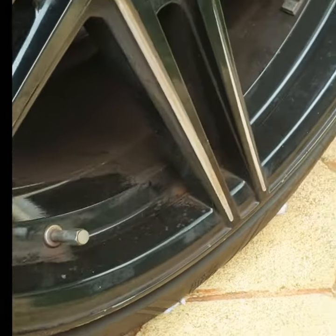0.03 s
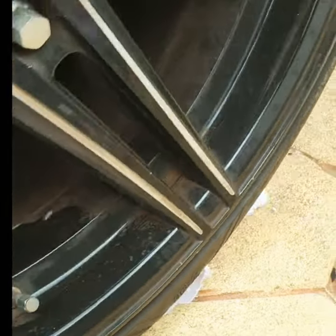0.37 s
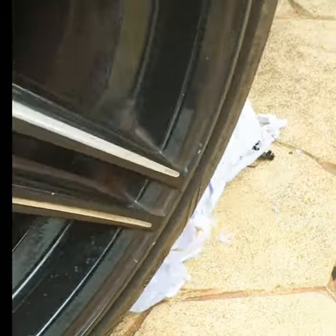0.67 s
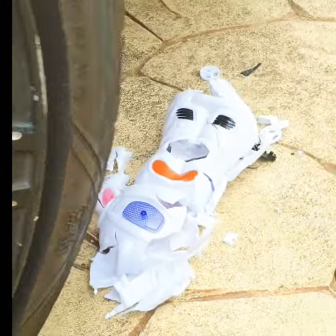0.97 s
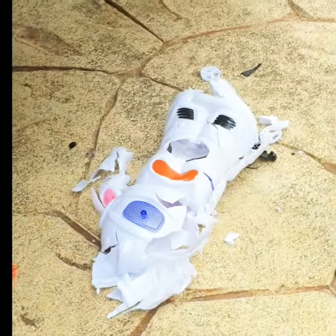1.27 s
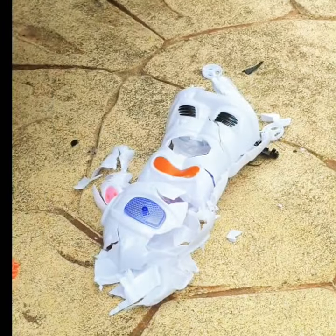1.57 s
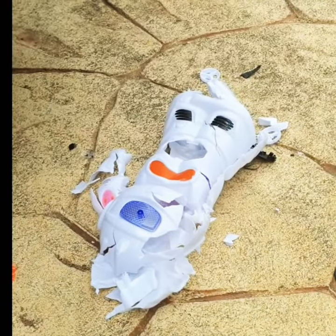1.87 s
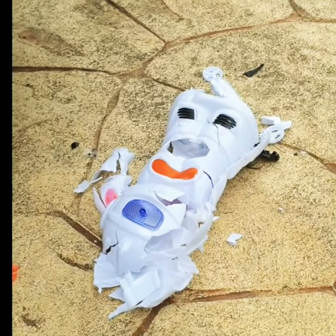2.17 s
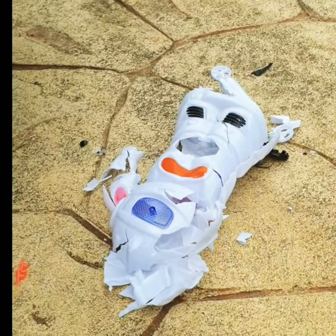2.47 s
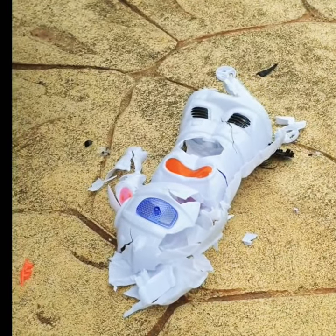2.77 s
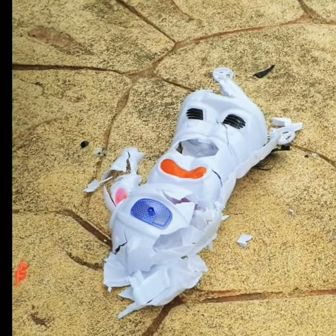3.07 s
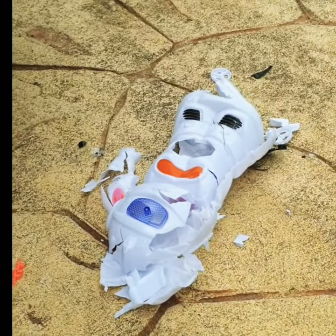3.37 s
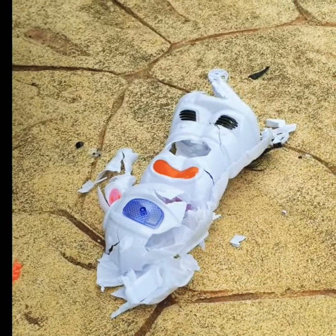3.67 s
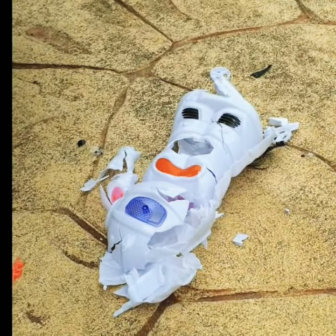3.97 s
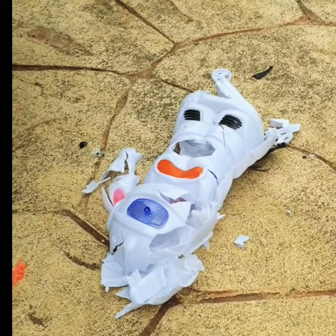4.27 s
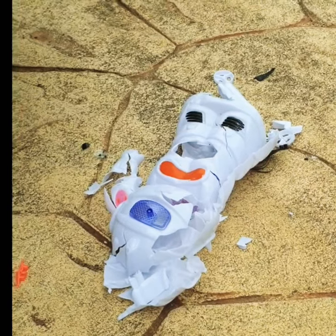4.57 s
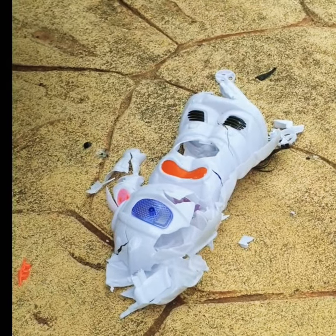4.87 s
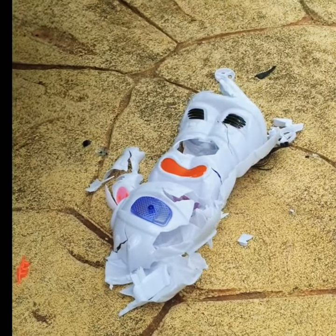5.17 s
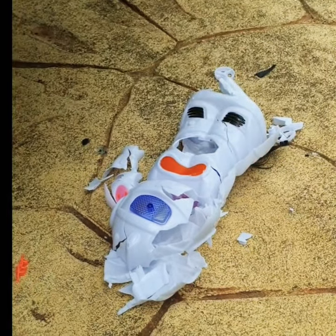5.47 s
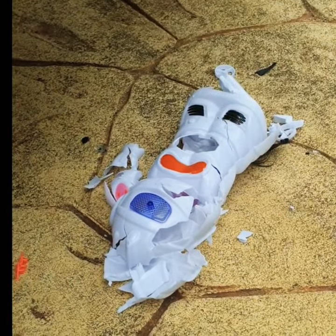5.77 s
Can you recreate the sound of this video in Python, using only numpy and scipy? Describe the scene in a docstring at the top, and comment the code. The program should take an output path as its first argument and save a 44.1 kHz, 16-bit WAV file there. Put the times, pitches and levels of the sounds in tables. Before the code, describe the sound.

A hollow plastic toy cracks sharply and crackles under a car tyre, then the idling engine's low rumble grows louder and revs lightly twice.

```python
"""Sharp cracks, close up: a hollow plastic toy bursts under a creeping car, then crackles as the tyre
rolls off. Stone paving in a yard, a phone's two microphones held just above the toy.
The idling four-cylinder engine booms and knocks, louder as the tailpipe nears, and lifts twice.
Hot metal pings under the car, the tyres crush grit, and the walls return a faint tail."""
import sys
import numpy as np
from scipy import signal
from scipy.fft import rfft, irfft
from scipy.io import wavfile
from scipy.ndimage import uniform_filter1d

SR = 44100
rng = np.random.default_rng(int(sys.argv[2]) if len(sys.argv) > 2 else 0)


def wrap_up_sound(samples):
    """Save the sound to the file named by the first command line argument, as 16-bit audio."""
    columns = np.atleast_2d(samples).T
    # keep every value between -1 and 1, then stretch to whole-number steps
    tamed = np.clip(columns, -1, 1)
    steps = np.round(tamed * 32767).astype(np.int16)
    wavfile.write(sys.argv[1], SR, steps)


N = 265041
T = np.arange(N) / SR

# Table levels are relative: each source adds its own gain.
# fractures of the shell, right under the phone: (time [s], level [dB], hollow thump [dB],
# ringing [dB], bite near 3 kHz [dB], treble [dB], splintering t60 [s], left minus right [dB])
CRACKS = [(.0038, -20, -11, 1, 2, 2, 0.0083, -22), (.0062, -10.5, 5.5, -3.5, -5.5, 3.5, 0.033, 2.5),
          (0.014, -22.5, 7, -2, -3.5, 5, 0.1, 3), (.0635, -35, -17, -20, -3, 1, 0.013, 7),
          (0.1359, -19, -20, -25, -1, -11.5, 0.028, 0), (.174, -40, -26, -22, 13, -7.5, 0.017, 1),
          (0.1913, -10, -14, -21, 1, 4, 0.006, 1), (0.1942, -26.5, -1.5, -9, -2, 4.5, 0.049, -8),
          (0.198, -30, -20, -20, -4, 7, 0.019, 6), (0.3022, -26, -28, -29, 4.5, -11.5, 0.045, 4),
          (0.3626, -12.5, -5, -16, 0.5, 4.5, 0.009, 0), (0.3651, -20.5, 5, -5, -3.5, 6.5, 0.073, 2.5),
          (0.467, -43, -19, -17, -2, -4, 0.063, 6), (0.5052, -26, -12, -28, -4, -5, 0.03, 4),
          (0.514, -42, -22, -20, 4, 7, 0.028, -2), (0.5342, -43, -28, -6, 0, 3, 0.032, 1),
          (.5411, -42, -25, -14, 1, -1, 0.051, 7), (0.5603, -34.5, -25, -26, 4, -4, 0.017, -1),
          (0.6095, -49.5, -19, -22, 3, 8, 0.052, 5), (.6295, -52, -24, -12, 5, 2, 0.023, 1),
          (0.661, -39, -16, -23, 2.5, -1, 0.02, 3), (0.692, -38, -22, -19, 0, -3, 0.11, 2),
          (0.743, -49, -22, -20, -2, 3, .025, 4), (.7522, -47, -19, -20, -5, 7, .02, 2),
          (.7668, -50, -20, -20, -6, 11, .027, 2), (0.787, -36, -24, -26, 4.5, -1, 0.032, 1.5),
          (0.795, -49, -22, -20, 0, 6, .04, 2), (.8185, -54, -18, -20, 0, 3, .02, 2),
          (0.844, -35.5, -23, -27, 1, -4.5, 0.013, 5), (0.916, -42.5, -22, -15, 0, -4, 0.025, 5),
          (0.9962, -49, -22, -22, -6, 7, .031, 1)]
# spectrum of a snapping edge: (frequency [Hz], level [dB])
SNAP_SPECTRUM = [(150, -38), (500, -1), (1100, 4), (1900, 0), (2800, 4.5), (4000, 5), (5200, -0.5),
                 (7000, 1.5), (9000, -5), (11000, -7.5), (15000, -6)]
# ringing of each crack: the shell's modes, with faint thin high tones above them:
# (frequency [Hz], level [dB], t60 [s])
CRACK_RING = [(473, -16, 0.059), (718, 0.5, 0.035), (772, 2, 0.032), (1230, -19, .03), (1410, 6, 0.025),
              (1655, -7, 0.027), (2490, -17, 0.02), (2750, -5, 0.036), (3707, -4, 0.051),
              (4340, -23, 0.043), (5000, -9, 0.059), (6740, -27, .06), (6970, -25, .06),
              (10600, -13, 0.065)]
# modes of the hollow body under the tyre: (frequency [Hz], level [dB], t60 [s])
HOLLOW_MODES = [(141, -13, 0.15), (185, -1, 0.063), (223.3, -21, 0.3), (249, -7.5, 0.063)]
# large pieces springing loose: (time [s], frequency [Hz], level [dB], t60 [s])
PIECES = [(.004, 597, -15, 0.071), (.006, 259, -25, 0.052), (.006, 2875, -26, 0.062),
          (.006, 3880, -29, 0.055), (0.1917, 2650, -16, 0.007), (0.1917, 3750, -17, 0.018),
          (0.1917, 4500, -19, 0.014), (0.193, 660, -20, .022), (.1935, 780, -19.5, 0.034),
          (0.3032, 1040, -38, 0.048), (0.363, 1540, -26, 0.03), (0.3648, 363, -21.5, 0.063),
          (.365, 465, -26, 0.032), (.3655, 720, -28, .025), (.3655, 822, -19.5, 0.054),
          (.366, 990, -30, 0.04), (.7876, 3840, -40, .018)]
CRUMBLE_FROM_S, TYRE_OFF_S, CRUMB_FADE_DB_PER_S = 0.32, 0.95, 2.5

# the engine's pace and exhaust note: (time [s], firing rate [Hz], level [dB])
FIRING = [(0.12, 24.65, -45), (0.9, 24.66, -44.5), (1.39, 23.3, -42.5), (1.89, 23.4, -39),
          (2.05, 23.66, -38), (2.46, 23.77, -34), (3.01, 23, -29.5), (3.45, 28.04, -23.5),
          (3.69, 27.94, -24.5), (4.16, 26.4, -29), (4.31, 24.75, -27.5), (4.46, 23.03, -25),
          (4.49, 23.16, -28), (4.68, 25.01, -21.5), (4.71, 25.06, -22.5), (5.07, 23.52, -27),
          (5.46, 22.44, -27), (5.95, 22.2, -27.5)]
# response of the exhaust pipe: (frequency [Hz], level [dB])
PIPE_SPECTRUM = [(22, -8), (25, 0), (28, 4), (90, 4.5), (112, 1), (140, 0.5), (168, -3.5), (178, -3),
                 (193, 3.5), (208, -12), (270, -6), (400, -15), (560, -22)]
# the tailpipe nears the microphones, then stays: (time [s], level [dB])
NEARNESS = [(0, -45.5), (1.55, -49.5), (2.0, -43.5), (2.6, -39), (3.15, -33.5), (6, -33.5)]
# dabs on the throttle: (start [s], hold [s], load [0-1])
THROTTLE = [(3.22, 0.39, 0.75), (4.537, 0.1, 1)]
# rumble of the exhaust gas: (frequency [Hz], level [dB])
RUMBLE_SPECTRUM = [(25, -30), (53, -4.5), (90, -6.5), (130, -12.5), (193, -5.5), (223, -13.5), (299, -15.5),
                   (374, -10.5), (426, -19), (485, -12.5), (565, -19), (682, -16.5), (904, -22.5),
                   (1500, -28), (1950, -34.5), (3300, -120)]
# hiss of gas and of tread: (frequency [Hz], level [dB])
HISS_SPECTRUM = [(710, -33), (1200, -4), (1570, -7.5), (1690, -9.5), (2020, -7.5), (2440, -9.5),
                 (3860, -13), (4150, -13.5), (4610, -19), (6430, -18), (8980, -24), (11200, -22),
                 (14500, -28.5)]
# ringing body panels: (frequency [Hz], width [Hz], level [dB])
PANEL_BANDS = [(191.5, 5.4, -9), (292.7, 5.1, -12.5), (479.5, 7.1, -16), (691, 10, -23.5)]
# resonances of the engine's knock: (frequency [Hz], width [Hz], level [dB])
KNOCK_BANDS = [(1150, 500, -6), (1560, 330, -6), (2000, 450, -6.5), (3020, 1800, -13)]

# pings from under the car: (time [s], level [dB], second mode [dB], third mode [dB])
PINGS = [(.7012, -31.5, -25, -27), (0.882, -43.5, -18, -21), (0.953, -54, -21, -18), (1.008, -63, -22, -22),
         (1.1152, -56, -18, -18), (1.302, -62, -20, -22), (1.3613, -53.5, -22, -24),
         (1.4121, -55, -11, -22), (1.4896, -46.5, -19, -28), (1.5462, -40.5, -19, -34),
         (1.617, -50.5, -22, -10), (1.652, -59, -20, -20), (1.7589, -49, -26, -26), (1.803, -55, -20, -20),
         (1.865, -55, -18, -18), (1.9032, -44, -27, -30), (1.935, -60, -20, -20), (2.05, -59, -18, -18),
         (2.1284, -55, -7, -15), (2.1974, -50.5, -24, -26), (2.2633, -51, -14, -26),
         (2.3214, -48.5, -24, -26), (2.362, -53, -20, -20), (2.402, -54, -20, -22), (2.6673, -50, -22, -22),
         (2.7064, -53, -14, -8), (2.724, -57, -20, -18), (2.802, -56, -21, -20), (2.885, -56, -20, -20),
         (3.035, -54, -20, -20), (3.0937, -52, -20, -20), (3.1288, -47, -18, -20),
         (3.1609, -47.5, -20, -18), (3.208, -52, -20, -20), (3.4488, -44.5, -20, -24),
         (3.5911, -49.5, -18, -20)]
# modes of the hot metal: (frequency [Hz], level [dB], t60 [s])
METAL_MODES = [(4044, 1, 0.096), (5600, 6, .05), (7920, 6, 0.08)]
# underbody clunks, and three hard engine knocks during the first dab on the throttle:
# (time [s], frequency [Hz], width [Hz], level [dB], t60 [s], rasp [dB])
CLUNKS_AND_HARD_KNOCKS = [(3.033, 3300, 1800, -46, .04, -16), (3.042, 2800, 200, -41, 0.066, -20),
                          (3.038, 1504, 1620, -39, 0.1, -22), (3.476, 1900, 900, -37, .045, -20),
                          (3.546, 1490, 1300, -36, 0.042, -20), (3.618, 1600, 800, -36, .045, -20),
                          (4.521, 1498, 1800, -40.5, 0.1, -2.5), (5.4405, 1000, 1505, -44, .025, -15)]
# modes of a part taking the load: (frequency [Hz], level [dB], t60 [s])
TOCK_MODES = [(1262, -27, 0.074), (1346, -44, 0.096)]

# spectrum of crushed grit: (frequency [Hz], level [dB])
GRIT_SPECTRUM = [(1000, 4.5), (3500, -6), (5000, 1.5), (6700, 5.5), (9500, 0), (11500, 4.5), (14500, -10)]
# the tyre scrubs on the paving: (middle [s], half length [s], level [dB])
SCRUBS = [(3.22, .025, -53), (3.36, .035, -52.5), (3.527, .015, -52), (3.68, 0.032, -56),
          (4.722, 0.15, -52.5), (4.864, 0.017, -52), (5.02, 0.016, -56)]
# small stones under the rear tyre: (time [s], frequency [Hz], level [dB])
STONES = [(4.657, 7300, -44), (4.693, 6500, -45), (4.735, 7300, -46), (4.778, 6400, -48),
          (4.816, 6350, -45), (4.858, 6840, -55), (4.973, 10980, -48), (5.017, 11230, -46),
          (5.186, 7780, -56)]
# whirr from the engine bay: (frequency [Hz], level [dB])
BAY_SPECTRUM = [(22, -16), (45, 0), (100, 1), (200, -5.5), (300, -1), (400, -7.5), (480, 1.5), (560, -8.5),
                (680, -4.5), (850, -12), (1500, -21), (3000, -20.5), (8000, -35), (14000, -33)]


def toy(crumb_db=-49, crumb_spread_db=2.0, crumbs=26, lag_s=.00009):
    """Closest to the phone: the shell fractures and crumbs break until the tyre rolls off."""
    out = np.zeros((2, N))
    for s, db, *character, balance_db in CRACKS:
        add(out, s, crack(*character) * undb(db) * pan(balance_db / 2))
    for s, size in scattered(CRUMBLE_FROM_S, TYRE_OFF_S, crumbs):
        crumb = crack(thump_db=-16, ring_db=-27, bite_db=-1, treble_db=2, t60=0.022)
        add(out, s, undb(crumb_db - CRUMB_FADE_DB_PER_S * s + crumb_spread_db * size) * crumb)
    # the toy lies nearer the right microphone: the left hears it later and duller
    late = np.interp(T - lag_s, T, out[0], left=0)
    out[0] = colour(late, [(600, -2.0), (2000, -3.5), (8000, -5.0), (13000, -2.5)])
    return out


def crack(thump_db, ring_db, bite_db, treble_db, t60, first_snap_db=15, scatter_db=4.5):
    """A snap and a dying run of tiny fractures; the shell, its hollow and faint high tones ring on."""
    t = T[:SR // 5]
    grains = unit(rng.standard_normal((3, len(t))) * undb(scatter_db * rng.standard_normal(len(t))))
    run = (grains[0] + 1.48 * grains[1:]) * fade(t, t60)  # shared grains plus each microphone's own
    run[:, 0] -= undb(first_snap_db)
    snap = signal.fftconvolve(run, snapping_edge(bite_db, treble_db)[None], axes=1)[:, :len(t)]
    ringing = undb(ring_db - 3) * ring(CRACK_RING, t, detune=0.0033)
    hollow = undb(thump_db - 3) * ring(HOLLOW_MODES, t, detune=0.018)
    return snap + rise(t, 0.0016) * (ringing + hollow)  # the whole shell takes a moment to move


def snapping_edge(bite_db, treble_db, bite_hz=2900, treble_hz=4500, patchy_db=1.6, size=512):
    """Impulse response of one breaking edge; each has its own peaks and dips."""
    hz = np.fft.rfftfreq(size, 1 / SR)
    bite = bite_db * np.exp(-(2 * np.log((hz + 1) / bite_hz)) ** 2)
    treble = treble_db * hz ** 2 / (hz ** 2 + treble_hz ** 2)
    patches = patchy_db * unit(uniform_filter1d(rng.standard_normal(len(hz)), size=2))
    cepstrum = irfft(np.log(gain_at(hz, SNAP_SPECTRUM) * undb(bite + treble + patches)))
    cepstrum[1:size // 2] *= 2  # minimum phase: the energy comes at the start
    cepstrum[size // 2:] = 0
    return irfft(np.exp(rfft(cepstrum)))


def splinters(level_db=-52, spread_db=3.5, centre_hz=4200, spread_octaves=0.68, wake_s=.014, count=150):
    """Slivers of plastic snap in flurries behind the later fractures, each at its own pitch."""
    out = np.zeros((2, N))
    fractures = [s for s, *_ in CRACKS if CRUMBLE_FROM_S < s < TYRE_OFF_S]
    times = rng.choice(fractures, count) + wake_s * rng.exponential(size=count)
    for s, (size, pitch) in zip(times, np.clip(rng.standard_normal((count, 2)), -2, 2)):
        hz = centre_hz * 2 ** (spread_octaves * pitch)
        db = level_db + spread_db * size - CRUMB_FADE_DB_PER_S * (s - CRUMBLE_FROM_S)
        add(out, s, burst([(hz, hz / 2, 0)], t60=0.013) * undb(db) * pan(1))
    return out


def pieces():
    """Each freed piece of shell rings with one short note."""
    out = np.zeros((2, N))
    for s, hz, db, t60 in PIECES:
        add(out, s, ring([(hz, db, t60)], T[:SR // 5]) * pan(2))
    return out


def exhaust(boom_db=2.5, pipe_db=-12, silencer_hz=61.64, silencer_width_hz=24.7, lag_s=0.00024):
    """Firing harmonics 2 and 3 boom in the silencer; the others slide through the pipe's resonances."""
    firing_hz, level_db = curves(FIRING)
    phase = firing_phase()
    off_resonance = [2 * (k * firing_hz - silencer_hz) / silencer_width_hz for k in (2, 3)]
    second, third = (undb(1.6 * walk(5.85)) / (1 + off ** 2) for off in off_resonance)
    boom = np.sqrt(2) * (second * np.sin(2 * phase) + third * np.sin(3 * phase)) / np.hypot(second, third)
    pipe = np.zeros(N)
    for k in (1, *range(4, 25)):  # turbulent gas makes each harmonic waver in strength and phase
        strength = gain_at(k * firing_hz, PIPE_SPECTRUM) * undb(1.47 * walk(9))
        pipe += strength * np.sin(k * phase + rng.uniform(0, 2 * np.pi) + 0.37 * walk(3.616))
    tone = undb(level_db) * (undb(boom_db) * boom + undb(pipe_db) * pipe)
    left = np.interp(T - lag_s, T, tone)  # it reaches the left microphone later
    return np.array([left, tone]) * pan(0.1)


def gas_flow(rumble_db=-2, panel_db=-1.5, hiss_db=-14.5, hiss_load_db=1.5, flicker_db=1.28):
    """Gas puffs with the firings and shakes the panels, louder when near; load lifts the hiss."""
    near_db = curves(NEARNESS)[0]
    puffs = (1 + 0.082 * np.cos(firing_phase())) * undb(flicker_db * walk(25.13))
    shake = diffuse()
    panels = undb(panel_db) * sum(undb(db) * unit(resonate(shake, hz, w)) for hz, w, db in PANEL_BANDS)
    rumble = undb(rumble_db) * unit(colour(diffuse(), RUMBLE_SPECTRUM)) * puffs
    hiss = unit(colour(diffuse(), HISS_SPECTRUM)) * np.sqrt(puffs) * pan(-1)
    return undb(near_db) * (panels + rumble + undb(hiss_db + hiss_load_db * engine_load()) * hiss)


def knocks(idle_db=-10.5, load_db=11.5, linger_s=0.22):
    """Every firing knocks: faintly at idle, plainly under load and for a moment after it."""
    out = np.zeros((2, N))
    load = np.maximum(engine_load(), np.interp(T - linger_s, T, engine_load()))
    level_db = curves(NEARNESS)[0] + idle_db + load_db * load
    firings = np.flatnonzero(np.diff(firing_phase() // (2 * np.pi)))
    for i in firings:
        gain = undb(level_db[i] + rng.standard_normal())
        add(out, T[i], gain * burst(KNOCK_BANDS, t60=0.047, rise_s=0.0021))
    return out


def firing_phase():
    """One turn for each firing of a cylinder, in radians."""
    return 2 * np.pi * np.cumsum(curves(FIRING)[0]) / SR


def engine_load(rise_s=0.086, fall_s=0.28):
    """Zero at idle; each dab on the throttle rises, holds and falls back."""
    return sum(load * np.interp(T - s, np.cumsum([0, rise_s, hold, fall_s]), [0, 1, 1, 0])
               for s, hold, load in THROTTLE)


def pings(tick_db=-10, bounce_below_db=-44, bounce_s=0.02, bounce_db=-15.5):
    """Hot metal under the car pings as it expands; after all but the hardest pings it bounces once."""
    out, t = np.zeros((2, N)), T[:SR // 3]
    for s, db, second_db, third_db in PINGS:
        modes = metal_modes(second_db, third_db)
        tick = undb(tick_db) * rng.standard_normal((2, len(t))) * fade(t, 0.014)
        gain = undb(db + 1) * pan(-1)
        add(out, s, gain * (ring(modes, t, detune=0.0019) * rise(t, .0006) + tick))
        if db < bounce_below_db:
            bounce = ring(modes, t, detune=0.0017) * undb(bounce_db)
            add(out, s + bounce_s * (1 + 0.35 * rng.standard_normal()), gain * bounce)
    return out


def metal_modes(second_db, third_db):
    """The hot metal's modes, with the two overtones shifted in level."""
    return [(hz, db + shift, t60) for (hz, db, t60), shift in zip(METAL_MODES, (0, second_db, third_db))]


def clunks_and_hard_knocks(rasp_hz=5650, rasp_width_hz=4980, tock_s=4.5205):
    """The underbody clunks, the engine knocks hard three times, and a part tocks as it takes load."""
    out, t = np.zeros((2, N)), T[:SR // 3]
    for s, hz, width_hz, db, t60, rasp_db in CLUNKS_AND_HARD_KNOCKS:
        add(out, s, undb(db) * burst([(hz, width_hz, 0), (rasp_hz, rasp_width_hz, rasp_db)], t60))
    add(out, tock_s, ring(TOCK_MODES, t) * rise(t, 0.0026))
    return out


def chatter(from_s=1.2, to_s=4.2, contacts_per_s=55, level_db=-72.5, spread_db=6):
    """Light contacts keep the loose metal ringing faintly, louder as the car nears."""
    contacts = (rng.random(N) < contacts_per_s / SR) & (T > from_s) & (T < to_s)
    near_db = curves(NEARNESS)[0]
    db = level_db + spread_db * np.clip(rng.standard_normal(N), -2, 2) + .3 * (near_db - near_db.mean())
    return signal.fftconvolve(contacts * undb(db), ring(metal_modes(-18, -18), T[:SR // 3]))[:N]


def grit(scatter_db=5, clump_db=3, hiss_db=-54.5, release_s=0.46, rear_from_s=2.2):
    """Grains break in clumps under the tread: the front tyre hisses and leaves, the rear one nears."""
    grains = rng.standard_normal((2, N)) * undb(scatter_db * rng.standard_normal(N) + clump_db * walk(260))
    front = undb(-48 - 32.5 * T)
    rear = undb(-66.5 + 2.5 * np.maximum(T - rear_from_s, 0))
    scrubs = sum(undb(db) * np.exp(-((T - s) / half) ** 2) for s, half, db in SCRUBS)
    crunch = unit(colour(grains, GRIT_SPECTRUM)) * np.sqrt(front ** 2 + rear ** 2 + scrubs ** 2)
    on_toy = np.interp(T - TYRE_OFF_S, [-release_s, release_s], [1, 0])
    hiss = unit(colour(diffuse(), HISS_SPECTRUM)) * undb(hiss_db) * on_toy
    return crunch * pan(-2) + hiss


def stones(width_hz=894):
    """Small stones crunch under the rear tyre, each at its own pitch."""
    out = np.zeros((2, N))
    for s, hz, db in STONES:
        add(out, s, burst([(hz, width_hz, 0)], t60=0.077, rise_s=.003) * undb(db) * pan(-0.5))
    return out


def engine_bay(level_db=-49.5):
    """Fan and belts whirr behind the bodywork, gently unsteady."""
    return undb(level_db + 0.39 * walk(16)) * unit(colour(diffuse(), BAY_SPECTRUM))


def yard(x, wet_db=-19, t60=0.31, dull_hz=6000):
    """The direct sound, and a faint tail off the car's flank and the yard walls."""
    t = T[:SR // 2]
    tail = rng.standard_normal((2, len(t))) * fade(t, t60) * rise(t, 0.0043)
    tail = signal.lfilter(*signal.butter(1, dull_hz, fs=SR), tail / np.sqrt(np.sum(tail ** 2) / 2))
    return x + undb(wet_db) * signal.fftconvolve(x, tail, axes=1)[:, :N]


def diffuse(alike_hz=620):
    """Noise from all round on two microphones: alike in the bass, unrelated above."""
    likeness = .98 * np.exp(-(np.fft.rfftfreq(N, 1 / SR) / alike_hz) ** 2)
    mid, side = irfft(rfft(rng.standard_normal((2, N))) * np.sqrt([1 + likeness, 1 - likeness]), N)
    return np.array([mid + side, mid - side]) / np.sqrt(2)


def burst(bands, t60, rise_s=0.00046):
    """A short knock of noise in steep resonances, unrelated on the two microphones."""
    t = T[:SR // 5]
    body = sum(undb(db) * unit(resonate(resonate(rng.standard_normal((2, len(t))), hz, w), hz, w))
               for hz, w, db in bands)
    return body * fade(t, t60) * rise(t, rise_s)


def ring(modes, t, detune=0.):
    """Decaying tones after a blow, each mistuned at random by a share of about `detune`."""
    return sum(undb(db) * np.sin(2 * np.pi * hz * (1 + detune * rng.standard_normal()) * t) * fade(t, t60)
               for hz, db, t60 in modes)


def resonate(x, hz, width_hz):
    """One resonance."""
    return signal.lfilter(*signal.iirpeak(hz, hz / width_hz, SR), x)


def colour(x, spectrum):
    """Filter a sound by a spectrum."""
    return irfft(rfft(x) * gain_at(np.fft.rfftfreq(N, 1 / SR), spectrum), N)


def gain_at(hz, spectrum):
    """Gain read from rows of (frequency [Hz], level [dB])."""
    f, db = np.transpose(spectrum)
    return undb(np.interp(np.log(hz + 1), np.log(f), db))


def curves(table):
    """A timed table's columns, sample by sample."""
    s, *columns = np.transpose(table)
    return [np.interp(T, s, c) for c in columns]


def scattered(start_s, end_s, count):
    """Events strewn unevenly over a stretch: (time [s], size [standard deviations])."""
    place, size = rng.random(count), rng.standard_normal(count)
    return zip(start_s + (end_s - start_s) * (np.arange(count) + place) / count, np.clip(size, -2, 2))


def walk(rate_hz):
    """Smooth random drift of rms 1."""
    k = int(SR / rate_hz)
    steps = np.repeat(rng.standard_normal(N // k + 1), k)
    return unit(uniform_filter1d(uniform_filter1d(steps, k), k)[:N])


def rise(t, rise_s):
    """Exponential onset."""
    return 1 - np.exp(-t / rise_s)


def fade(t, t60):
    """Decay by 60 dB in t60 seconds."""
    return np.exp(-np.log(1000) * t / t60)


def pan(db):
    """Left microphone up by db, right down by as much."""
    return undb([[db], [-db]])


def add(out, s, sound):
    """Mix a sound in at s seconds."""
    i = max(int(s * SR), 0)
    out[:, i:i + sound.shape[-1]] += sound[..., :N - i]


def undb(db):
    """Decibels to gain."""
    return 10 ** (np.asarray(db) / 20)


def unit(x):
    """Scale to rms 1."""
    return x / np.sqrt(np.mean(x ** 2))


def scene():
    """At the phone: the car's drone and tyres come direct; cracks, pings and knocks also echo."""
    car = exhaust() + gas_flow() + engine_bay() + grit() + stones()
    strikes = toy() + splinters() + pieces() + pings() + clunks_and_hard_knocks() + chatter() + knocks()
    return car + yard(strikes)


def record(dry, top_hz=14600):
    """The phone rounds the loudest peaks and cuts the top."""
    return signal.sosfilt(signal.ellip(8, .2, 70, top_hz, fs=SR, output="sos"), np.tanh(dry))


dry = scene()
out = record(dry)
wrap_up_sound(out)
```